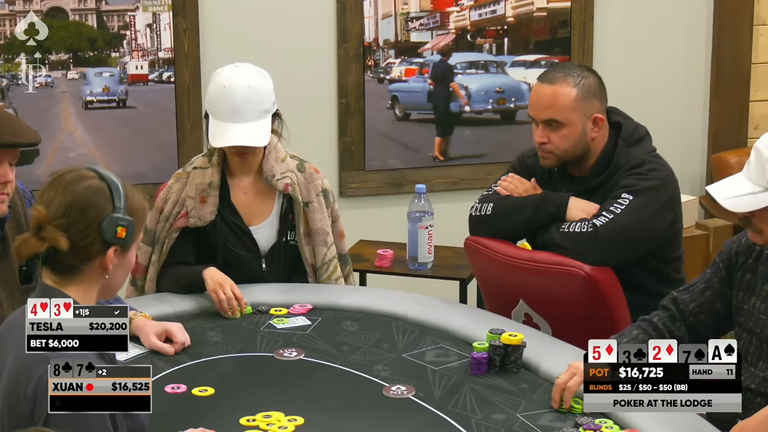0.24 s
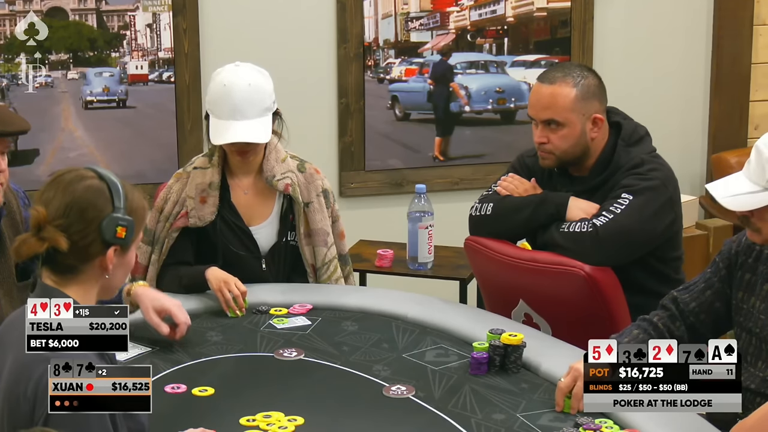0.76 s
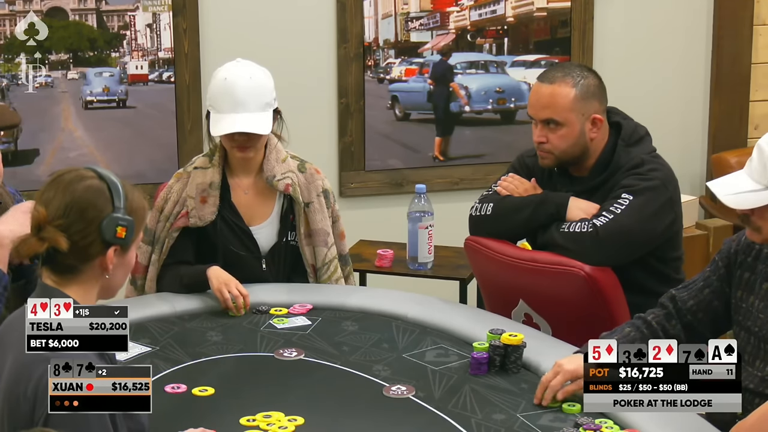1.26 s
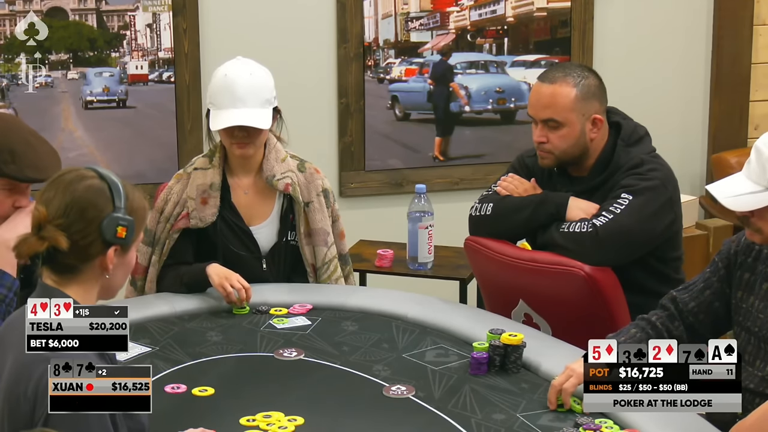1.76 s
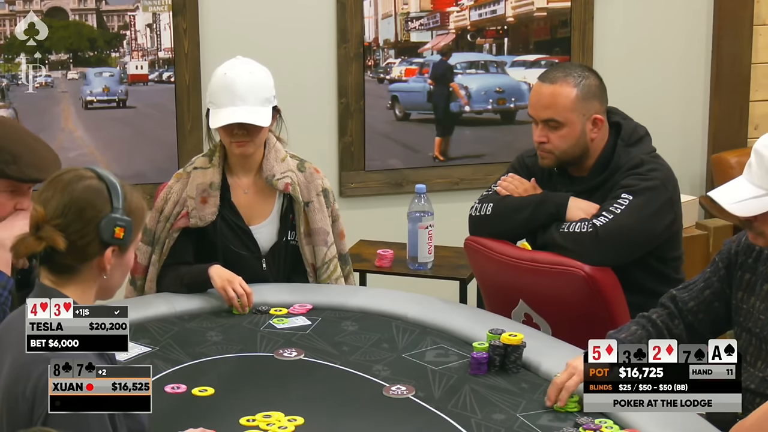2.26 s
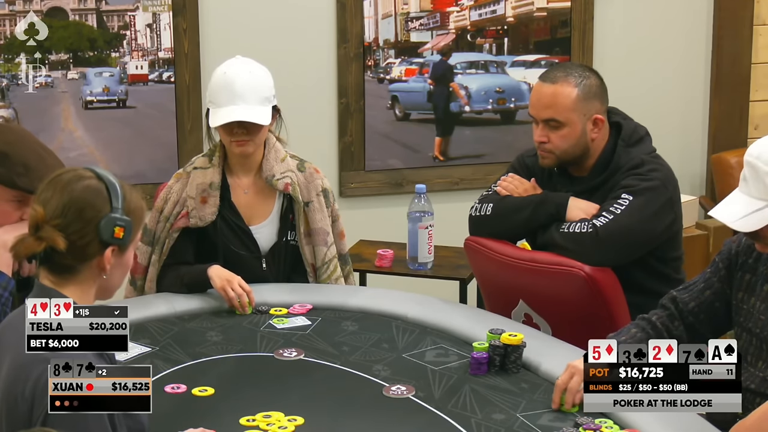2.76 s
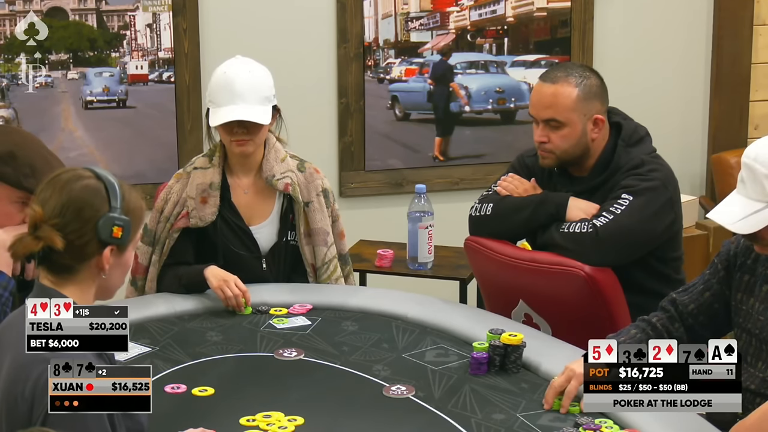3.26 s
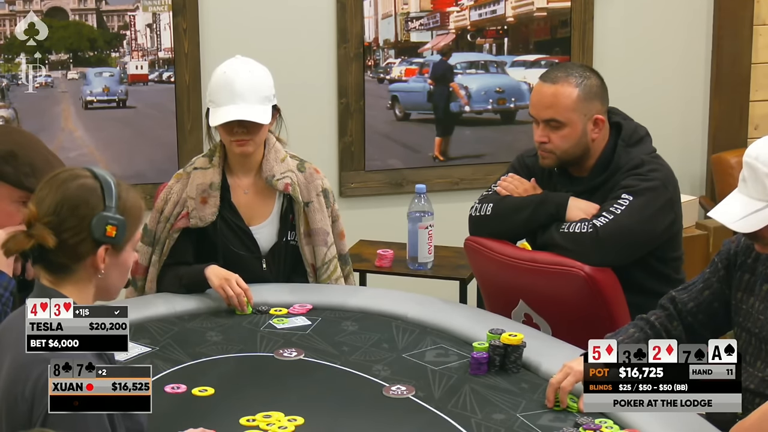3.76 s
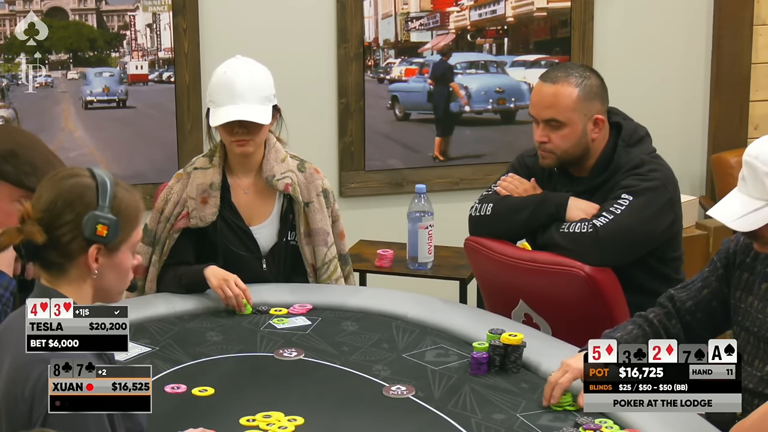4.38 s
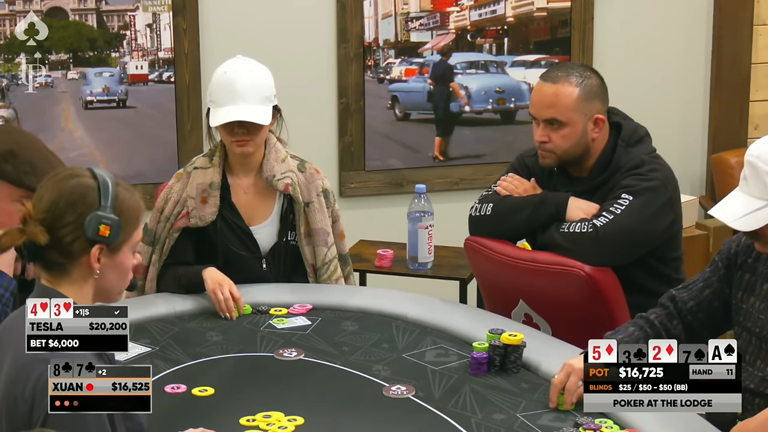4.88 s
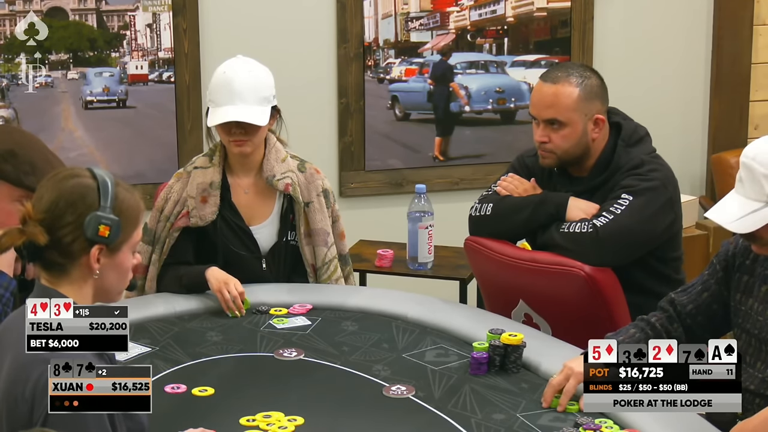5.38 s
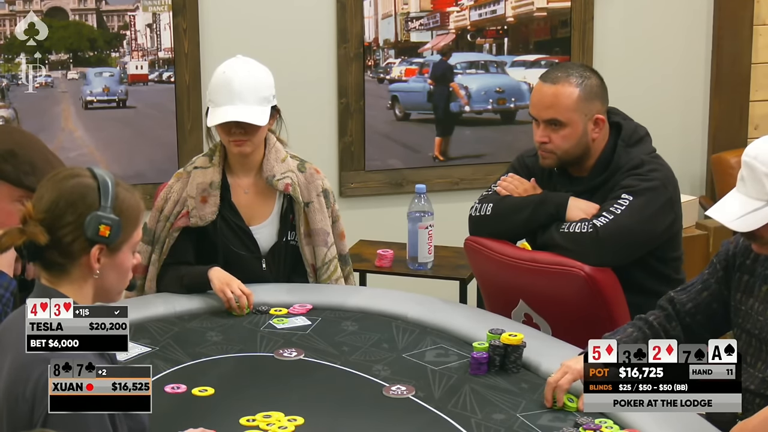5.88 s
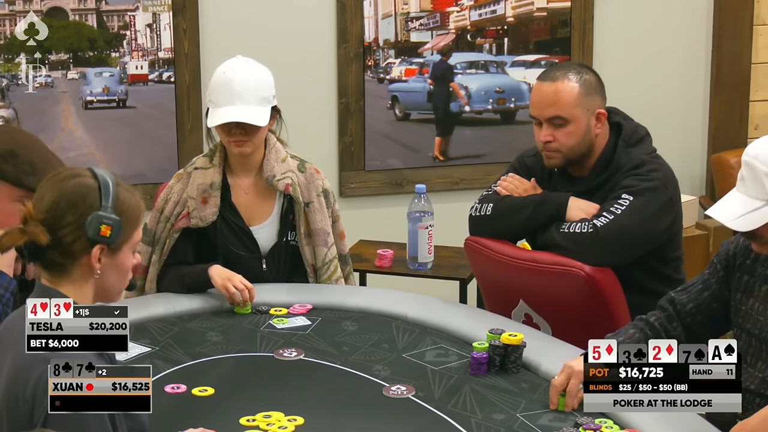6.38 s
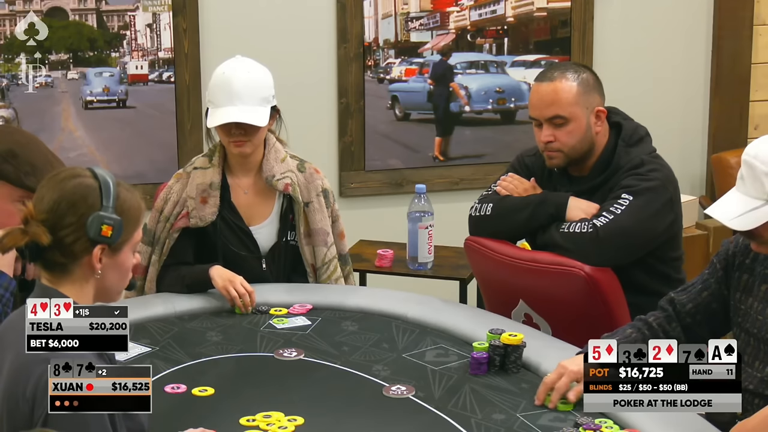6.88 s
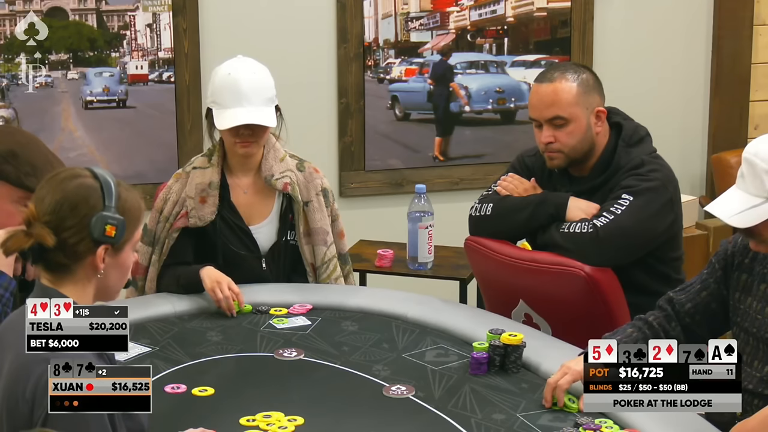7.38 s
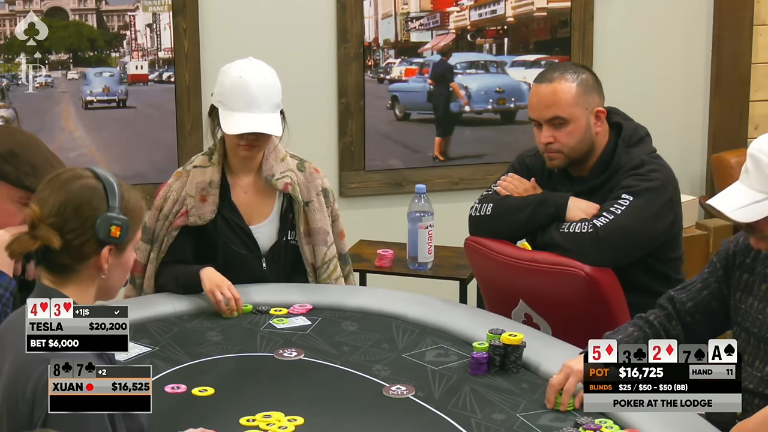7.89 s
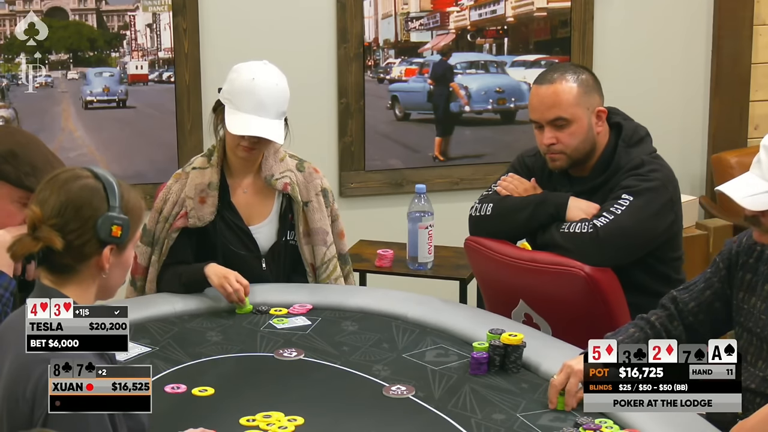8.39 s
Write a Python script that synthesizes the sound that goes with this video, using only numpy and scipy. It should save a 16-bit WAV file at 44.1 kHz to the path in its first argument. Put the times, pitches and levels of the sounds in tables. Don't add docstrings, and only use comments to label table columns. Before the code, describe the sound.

Close, dry chip clatter: bright ticks, hard stack clacks and dull felt thuds, uneven pauses between, over quiet ventilation hum in a small room.

```python
import sys
import numpy as np
from scipy import signal
from scipy.fft import rfft, irfft
from scipy.io import wavfile
from scipy.ndimage import uniform_filter1d

SR = 44100
rng = np.random.default_rng(int(sys.argv[2]) if len(sys.argv) > 2 else 0)


def waveform_to_disk(signal):
    frames = np.transpose(np.atleast_2d(signal))
    scaled = np.clip(frames, -1, 1) * 32767
    samples = np.round(scaled).astype(np.int16)
    wavfile.write(sys.argv[1], SR, samples)


def to_linear_factor(level_db):
    exponent = np.asarray(level_db, float) / 20
    return 10 ** exponent


N = 381024
BLOW_SAMPLES = 2048
HUM_HZ, HUM_DB = 120, -6.5


def chip_contacts():
    # start_s, clack_peak_db, clack_hz, tick_peak_db
    clacks = [(.1631, -25, 1895, -34), (.1821, -24, 4360, -30), (.2077, -27, 2770, -37),
              (.9732, -19.5, 3800, -26), (.9773, -20.5, 2660, -23.5), (1.0422, -19, 4630, -24.5),
              (1.0579, -25.5, 2670, -32), (1.3679, -23, 2150, -43.5), (2.019, -28, 1970, -33),
              (2.039, -20, 1490, -29), (2.0445, -22.5, 1980, -20), (2.0493, -11.5, 2238, -19.5),
              (3.8525, -25, 2290, -32), (3.896, -22.5, 1570, -30.5), (4.2695, -26.5, 1985, -29.5),
              (4.303, -13.5, 2590, -26.5), (4.503, -33, 4430, -30), (5.4028, -12, 3540, -23),
              (5.414, -20.5, 3210, -34), (5.4212, -21, 2500, -53), (5.6704, -21, 2180, -33),
              (5.8678, -23.5, 1550, -20), (5.8844, -38, 1630, -24), (5.8943, -35, 2190, -44.5),
              (6.4318, -41.5, 1400, -37), (6.8213, -29, 1600, -22.5), (7.522, -24, 1700, -22.5),
              (7.5456, -23.5, 1630, -23.5), (7.5713, -29, 1980, -49), (7.6152, -18, 2443, -16.5),
              (7.6185, -15.5, 2200, -33), (.7425, -21.5, 2470, -43), (.7495, -30.5, 2070, -50),
              (5.1902, -34, 2280, -20.5), (5.194, -42, 3020, -21), (5.2025, -25.5, 2400, -23),
              (5.2125, -39, 2420, -29), (4.9965, -26.5, 1810, -49), (8.5232, -14, 2893, -20),
              (8.5246, -14.5, 2220, -30)]
    # start_s, clack_peak_db, clack_hz, tick_re_clack_db
    touches = [(0.4236, -46, 2150, -6), (0.758, -32, 1830, -19), (0.7764, -44, 2320, -12),
               (0.804, -41, 2300, -5), (1.2426, -48.5, 2690, -7), (1.329, -31, 2250, -14.5),
               (1.387, -28, 2200, -9), (1.3804, -23, 2150, -22), (1.412, -37, 2030, -12),
               (1.643, -44.5, 2080, -18), (1.682, -43, 2000, -8), (1.8144, -43, 2000, -15),
               (1.8502, -47, 2010, -15), (2.2007, -51, 2180, -13), (2.485, -50, 2590, -15),
               (3.2306, -31.5, 3620, -31), (3.717, -57, 2320, -12), (4.1989, -54, 1840, -18),
               (4.758, -51, 2180, -9), (4.857, -45.5, 2620, -28), (4.9282, -47, 2420, -14),
               (5.045, -39, 2590, -24), (5.0998, -51, 2430, -17), (5.376, -43, 1960, -19),
               (5.391, -29.5, 3660, -14), (5.426, -39, 2890, -15), (5.443, -35, 2380, -15),
               (5.463, -28, 2140, -23), (5.4834, -35, 1850, -25), (5.5494, -46, 2000, -2),
               (5.6247, -44, 3600, -14), (5.8157, -49, 2120, -12), (6.0727, -37.5, 2420, -9),
               (6.1188, -40.5, 3100, -1), (6.3285, -55, 3900, -10), (6.5075, -50, 3870, -15),
               (7.264, -48, 1900, -16), (7.9124, -55, 2440, -13), (7.9315, -44, 3570, -29),
               (7.9526, -35.5, 2740, -24)]
    # start_s, clack_peak_db, tick_peak_db
    flicks = [(1.0871, -30, -32), (1.0916, -29, -36.5), (1.3228, -28.5, -35), (1.3575, -25.5, -29),
              (1.711, -29, -36.5), (1.7432, -39.5, -64), (1.831, -36.5, -44), (1.8799, -34.5, -36),
              (1.9596, -37.5, -63), (1.9814, -33, -50), (2.46, -46, -53), (2.55, -41.5, -44),
              (2.5917, -46, -55), (2.703, -34, -38.5), (2.7755, -34.5, -34), (3.3943, -40, -30.5),
              (4.3787, -29.5, -38), (4.396, -35, -33), (4.473, -31, -36), (4.4818, -39, -43),
              (4.5199, -32, -22), (6.168, -39, -55), (6.2744, -29, -49), (6.4233, -37, -30.5),
              (6.4457, -35, -34), (6.5682, -41.5, -66), (6.795, -26, -35), (7.9582, -28.5, -39),
              (8.3453, -33, -43)]
    # start_s, clack_peak_db, tick_peak_db
    taps = [(.3804, -34.5, -45.5), (.4419, -34, -46.5), (.451, -43, -56), (.9957, -39, -47),
            (1.4604, -33.5, -33), (1.7743, -36.5, -49), (1.8917, -39, -48), (2.2143, -39, -47),
            (2.239, -29.5, -33), (2.2772, -31.5, -44), (2.5226, -46.5, -40), (2.6271, -37.5, -35.5),
            (3.411, -32, -40), (4.3627, -31, -46), (4.4457, -34, -37), (5.5247, -38, -41),
            (5.533, -34.5, -43), (6.0066, -36, -44), (6.128, -48, -43), (6.265, -35.5, -46),
            (6.2872, -29.5, -39), (6.3549, -39, -41), (6.5506, -41.5, -53), (6.7625, -33.5, -31.5),
            (6.8115, -28, -29), (6.869, -30, -31.5), (7.4728, -28.5, -32.5), (7.4789, -34, -52.5),
            (7.9481, -37, -39), (8.3912, -41, -45)]
    # start_s, peak_db
    far_clacks = [(0.192, -26), (0.6927, -41), (0.773, -31.5), (1.38, -31), (1.5796, -28.5), (1.598, -36),
                  (1.705, -45), (2.161, -39), (2.6484, -34), (3.052, -36.5), (3.2195, -44), (3.237, -37.5),
                  (3.2468, -39), (3.303, -42.5), (3.5365, -33), (3.866, -41), (4.9026, -47.5), (5.024, -45),
                  (5.177, -38), (5.363, -32.5), (5.373, -27.5), (4.322, -45), (4.335, -40), (4.347, -41),
                  (6.982, -28.5), (6.999, -36), (7.671, -31.5), (7.6816, -41), (7.706, -40), (7.817, -46),
                  (8.404, -42)]
    # start_s, peak_db
    rim_grazes = [(2.8007, -43.5), (5.2, -32.5), (1.272, -56), (1.952, -45), (7.596, -41), (2.5295, -48),
                  (2.59, -46), (1.441, -41), (2.742, -49), (5.833, -50), (7.655, -54), (7.681, -46),
                  (7.55, -32.5), (7.495, -44), (6.044, -54), (6.36, -46), (8.1961, -37), (8.2408, -41),
                  (0.188, -35), (1.4971, -51), (1.7526, -47), (1.9607, -59), (1.9791, -51), (1.995, -39.5),
                 (2.0335, -29), (2.2007, -50), (2.2352, -35), (2.2622, -48), (2.287, -53), (2.2998, -47),
                 (2.3174, -57), (2.7156, -48), (2.7936, -38), (2.8162, -51), (4.318, -36), (4.477, -34.5),
                 (5.176, -46), (5.5636, -49), (5.629, -52), (5.692, -40), (5.7096, -41), (5.8463, -41),
                 (5.895, -54), (6.092, -52), (6.1726, -35.5), (6.1973, -43), (6.3773, -42), (6.7866, -36),
                 (6.8546, -38), (6.9501, -51), (8.3561, -51)]
    # start_s, first_peak_db, gap_s, change_db (per chip), tick_re_clack_db
    runs = [
        (4.9806, -40, 0.004, -0.5, -16),
        (5.041, -44.5, 0.0089, 0.5, -27),
        (5.467, -23, 0.0066, -2.5, -36),
        (7.0806, -27.5, 0.0049, -2, -30),
        (7.754, -41.5, 0.017, -1.5, -10),
        (8.4959, -20.5, 0.0044, 2, 0.5),
    ]
    far_tick_db, graze_clack_db = -31, -8.5
    held = taps + [(s, db, db + far_tick_db) for s, db in far_clacks]
    held += [(s, db + graze_clack_db, db) for s, db in rim_grazes]
    for s, db, gap_s, change_db, tick_db in runs:
        for k in range(3):
            chip_db = db + k * change_db
            held.append((s + k * gap_s, chip_db, chip_db + tick_db))
    contacts = clacks + [(s, db, hz, db + tick_db) for s, db, hz, tick_db in touches]
    for rows, usual_hz, spread in [(held, 2238, .25), (flicks, 3723, .06)]:
        for s, db, tick_db in rows:
            contacts.append((s, db, usual_hz * (1 + spread * (rng.random() - .5)), tick_db))
    return contacts


def clicks():
    # hz, level_db, t60_s
    clack_modes = [(2150, -11.5, 0.024), (2473, -15.5, 0.011), (3604, -20, 0.048)]
    # hz, level_db, t60_s
    tick_modes = [(6150, -2, 0.0015), (9685, 10.5, 0.0086), (10780, 10, 0.0017)]
    clack_top_hz, tick_foot_hz = 4385, 5300
    crack_share = .9
    rows = chip_contacts()
    out, draws = np.zeros(N), rng.random((len(rows), 64))
    for (s, clack_db, clack_hz, tick_db), draw in zip(rows, draws):
        clack = np.array([(clack_hz, 0, .011)] + clack_modes)
        clack[1:, 0] *= 1 + .2 * (draw[16:19] - .5)
        clack[1:, 1] += 12 * (draw[20:23] - .5)
        tick = np.array(tick_modes)
        tick[:, 0] *= 1 + .1 * (draw[24:27] - .5)
        tick[:, 1] += 14 * (draw[32:35] - .5)
        contacts = chatter(draw, spread_s=.0014, fall_db=7.5)
        body = peak_one(ringing(clack)) + crack_share * crack(1300, 4250, t60_s=.012)
        edge = peak_one(ringing(tick)) + .3 * crack(5000, 7000, t60_s=.019)
        edge += .73 * crack(8400, 12180, t60_s=.011)
        body = peak_one(steep(np.convolve(contacts, body), clack_top_hz, "low"))
        edge = peak_one(steep(np.convolve(contacts, edge), tick_foot_hz, "high"))
        add(out, s, to_linear_factor(clack_db - 4.0) * body)
        add(out, s, to_linear_factor(tick_db - 5.5) * edge)
    return out


def chatter(draw, spread_s, fall_db):
    contacts = np.zeros(512)
    at = np.cumsum(np.r_[0, .3 + draw[1:5]]) * spread_s * SR
    level_db = -fall_db * (np.array([1.5, 0, 1, 2, 3]) + draw[5:10] * [1, 0, 1, 1, 1])
    contacts[np.clip(at, 0, 511).astype(int)] = to_linear_factor(level_db) * np.sign(draw[10:15] - .5)
    return contacts


def ringing(modes):
    t = np.arange(BLOW_SAMPLES) / SR
    hz, level_db, t60_s = np.transpose(modes)[:, :, None]
    return np.sum(to_linear_factor(level_db - 60 * t / t60_s) * np.sin(2 * np.pi * hz * t), axis=0)


def crack(low_hz, high_hz, t60_s):
    rise_s = .00033
    band = signal.butter(2, [low_hz, min(high_hz, .45 * SR)], "band", fs=SR, output="sos")
    t = np.arange(BLOW_SAMPLES) / SR
    noise = signal.sosfilt(band, rng.standard_normal(BLOW_SAMPLES))
    return peak_one(noise * to_linear_factor(-60 * t / t60_s) * np.minimum(t / rise_s, 1))


def add(out, s, sound):
    start = max(round(s * SR) - np.argmax(np.abs(sound)), 0)
    out[start:start + len(sound)] += sound[:N - start]


def peak_one(x):
    return x / (np.max(np.abs(x)) + 1e-12)


def rms_one(x):
    return x / np.sqrt(np.mean(x ** 2) + 1e-20)


def steep(x, hz, side):
    return signal.sosfilt(signal.butter(4, hz, side, fs=SR, output="sos"), x)


def singing():
    # start_s, level_db, upper_mode_change_db
    sings = [(1.0871, -35, -9), (1.7432, -37.5, -8), (1.831, -47, -2.5), (4.3787, -30, -14),
             (4.396, -27.5, -15), (4.4818, -35.5, 1), (6.168, -47, 2), (6.2744, -28, -10), (6.4233, -53, 1),
             (8.3453, -33, 0.5), (1.9596, -31, -15), (8.3567, -46, 0), (4.503, -38, 5), (2.261, -50, 10),
             (7.6, -46, 4)]
    # hz, level_db, t60_s
    free_chip = [(3680, -8, .028), (3800, -13, .02), (6440, -8, .035)]
    out = np.zeros(N)
    for (s, level_db, upper_db), draw in zip(sings, rng.random((len(sings), 2))):
        modes = np.array(free_chip) * [1 + .019 * (draw[0] - .5), 1, .85 + .5 * draw[1]]
        modes[-1, 1] += upper_db
        add(out, s, to_linear_factor(level_db) * ringing(modes))
    return out


def chip_rattle(per_s):
    # hz, level_db (per Hz)
    rustle = [(710, -30), (1200, -4), (2390, 4.5), (4500, -2), (6390, 1.5), (7530, -17.5), (8580, -1.5),
              (10500, -7), (14500, -16), (15700, -18), (16400, -70)]
    hits = rng.random(N) < per_s * to_linear_factor(3 * drift(40)) / SR
    sizes = to_linear_factor(3.0 * np.minimum(rng.exponential(1, N), 4)) * hits
    grains = signal.lfilter([1], [1, -.975], sizes) + .75
    return colour(grains * rng.standard_normal(N), rustle)


def drift(rate_hz):
    knots = rng.standard_normal(1200)
    return np.interp(np.arange(N) / SR * rate_hz, np.arange(1200), knots)


def colour(x, spectrum):
    hz, level_db = np.transpose(spectrum)
    bins_hz = np.maximum(np.arange(len(x) // 2 + 1) * SR / len(x), 1)
    gain_db = np.interp(np.log(bins_hz), np.log(hz), level_db)
    return rms_one(irfft(rfft(x) * to_linear_factor(gain_db), len(x)))


def thuds():
    # start_s, peak_db, pitch_hz
    felt_thuds = [(0.1606, -30, 538), (.195, -31.5, 290), (0.5862, -48, 545), (0.778, -37.5, 553),
                  (1.354, -29.5, 403), (1.3799, -31, 520), (1.3878, -14, 556), (1.4173, -40, 590),
                  (1.8593, -43, 516), (2.2152, -31, 540), (2.65, -41, 430), (3.0484, -27, 277),
                  (3.066, -47, 304), (3.461, -42, 554), (4.2728, -33.5, 577), (4.9819, -40.5, 376),
                  (5.015, -41, 282), (5.189, -24.5, 530), (5.2291, -29.5, 516), (5.6748, -20.5, 401),
                  (6.821, -24.5, 625), (7.0244, -28.5, 490), (7.0316, -33, 565), (7.0352, -34, 260),
                  (7.04, -32, 250), (7.0665, -36.5, 485), (3.0423, -29.5, 295), (7.081, -37, 365),
                  (7.137, -42, 298), (7.4725, -29, 629), (7.5711, -21.5, 520), (7.607, -27.5, 330),
                  (7.6182, -21, 602), (8.5589, -32.5, 557), (8.6072, -34, 520)]
    # start_s, peak_db, pitch_hz
    knocks = [(0.185, -25, 1050), (0.692, -43, 800), (0.75, -32.5, 1060), (0.9772, -20, 980),
              (1.0435, -28.5, 790), (1.0922, -35, 910), (1.3196, -38.5, 735), (1.5813, -43, 825),
              (2.0186, -31, 1040), (2.039, -22, 990), (2.0522, -32, 950), (3.238, -43, 820),
              (3.537, -43.5, 1380), (3.854, -23.5, 890), (3.868, -30.5, 850), (3.8925, -25.5, 1170),
              (4.998, -43, 1250), (5.404, -32, 950), (5.416, -30, 1300), (5.524, -36.5, 1200),
              (5.868, -21, 984), (5.885, -24, 935), (6.1453, -42.5, 1030), (6.2861, -35, 1220),
              (7.4852, -35, 770), (7.5218, -21.5, 1030), (7.544, -26.5, 1100), (7.773, -39.5, 915),
              (7.9595, -36.5, 930), (8.5251, -16.5, 910), (5.6723, -24.5, 1000), (1.8251, -45.5, 763),
              (6.74, -47.5, 700), (1.704, -48, 1290)]
    cycles, top_hz = 7.0, 1700
    sag = .21
    rows = felt_thuds + knocks
    out, draws = np.zeros(N), rng.random((len(rows), 24))
    age = np.arange(BLOW_SAMPLES)
    for (s, peak_db, hz), draw in zip(rows, draws):
        t60_s = cycles / hz
        modes = [(hz, 0, t60_s),
                 (hz * (.6 + .95 * draw[16]), -13, t60_s),
                 (hz * (1.4 + .6 * draw[17]), -12, .51 * t60_s)]
        ahead = sag * 2 * SR / hz * (1 - np.exp(-age * hz / SR / 2))
        ring = np.interp(np.minimum(age + ahead, BLOW_SAMPLES - 1), age, ringing(modes))
        top = peak_one(ring) + .384 * crack(.5 * hz, 1.6 * hz, t60_s=.0227)
        swell = np.minimum(age / SR * hz / .77, 1)
        contacts = chatter(draw, spread_s=.0015, fall_db=12.0)
        thud = peak_one(steep(np.convolve(contacts, top * swell), top_hz, "low"))
        add(out, s, to_linear_factor(peak_db + .87) * thud)
    return out


def bumps():
    # start_s, peak_db, pitch_hz, t60_s
    hits = [
        (3.05, -32.5, 257, 0.3),
        (7.03, -33.5, 301, 0.26),
        (7.112, -37.5, 270, 0.34),
    ]
    out, t = np.zeros(N), np.arange(SR // 4) / SR
    for s, peak_db, hz, t60_s in hits:
        band = signal.butter(2, [hz / .96, hz * 1.72], "band", fs=SR, output="sos")
        roll = rms_one(signal.sosfilt(band, rng.standard_normal(len(t))))
        roll *= to_linear_factor(-60 * t / t60_s) * np.minimum(t * hz / 2, 1)
        start = round((s - 2 / hz) * SR)
        out[start:start + len(t)] += to_linear_factor(peak_db - 6.5) * roll
    return out


def room(x):
    t60_s, cut_hz, first_s = .22, 3500, .006
    t = np.arange(SR // 2) / SR
    tail = rng.standard_normal(len(t)) * to_linear_factor(-60 * t / t60_s) * (t > first_s)
    tail = signal.lfilter(*signal.butter(1, cut_hz, fs=SR), tail)
    return signal.fftconvolve(x, tail / np.sqrt(np.sum(tail ** 2)))[:N]


def near_gains():
    # start_s, room_db, closing_db_per_s, rattle_db
    openings = [(0.154, -43.5, 72, -45.5), (0.743, -45, 75, -55), (.975, -52.5, 23, -68),
                (1.35, -42.5, 55, -45), (1.954, -59.5, 14.5, -54), (2.034, -44, 53.5, -44.5),
                (2.196, -62, 40, -60), (2.253, -62, 36.5, -59.5), (2.515, -65.5, 16, -61.5),
                (3.043, -47.5, 44.5, -67.5), (3.851, -44, 71, -46), (4.267, -49.5, 81, -49),
                (4.312, -59.5, 48, -53.5), (4.38, -75.5, 59, -57), (4.98, -59, 70, -84),
                (5.185, -43, 76.5, -37.5), (5.4, -47, 43, -61), (5.466, -52, 58.5, -73.5),
                (5.619, -60, 115, -50.5), (5.667, -45, 74, -48), (5.815, -62, 55, -57),
                (5.869, -45.5, 55.5, -39.5), (6.119, -75, 43, -55), (6.422, -77, 52, -57),
                (6.813, -43, 66, -38.5), (7.029, -43.5, 87, -67), (7.466, -44.5, 50, -53),
                (7.519, -49.5, 56, -43.5), (7.95, -56, 80, -86), (8.498, -45.5, 51, -78)]
    t, air, rattle = np.arange(N) / SR, np.zeros(N), np.zeros(N)
    for s, room_db, closing_db, rattle_db in openings:
        age_s = np.clip(t - s, 0, 3)
        air_now = to_linear_factor(room_db - closing_db * age_s) * np.minimum(age_s / .031, 1)
        rattle_now = to_linear_factor(rattle_db - 2.71 * closing_db * age_s) * np.minimum(age_s / .0036, 1)
        air = np.maximum(air, air_now)
        rattle = np.maximum(rattle, rattle_now)
    return air, rattle


def near_room(buzz):
    # hz, level_db (per Hz)
    air_spectrum = [(15, -58), (25, -54), (59, -17.5), (123, -8.5), (217, -7.5), (887, -10.5), (1700, -24),
                    (2280, -15.5), (4610, -35.5), (6380, -57), (7710, -40.5), (9840, -44), (14000, -49),
                    (16000, -71.5)]
    return coloured_noise(air_spectrum, flicker_db=2.8) + to_linear_factor(HUM_DB) * buzz


def resting_room(buzz):
    # time_s, level_db
    mixer_level = [(0, -62.5), (1.65, -64.5), (1.92, -66.5), (2.4, -66), (2.7, -66.5), (4.3, -62.5),
                   (4.45, -83), (4.6, -64.5), (4.7, -64.5), (5.6, -59.5), (6.2, -65), (6.45, -67),
                   (6.6, -70.5), (6.7, -64), (7.4, -61.5), (8.2, -65.5), (8.4, -62), (8.64, -79)]
    # hz, level_db (per Hz)
    rumble = [(15, -43), (25, -36), (49, -22), (120, 8.5), (180, -2.5), (503, -2), (863, -7.5),
              (1650, -19.5), (1940, -14), (2350, -15), (4740, -27.5), (11300, -30), (14800, -37),
              (16000, -53)]
    level_db = np.interp(np.arange(N) / SR, *np.transpose(mixer_level))
    return to_linear_factor(level_db) * (coloured_noise(rumble, flicker_db=1.5) + to_linear_factor(HUM_DB - 9.0) * buzz)


def coloured_noise(spectrum, flicker_db):
    return colour(rng.standard_normal(N) * to_linear_factor(flicker_db * drift(25)), spectrum)


def hum():
    width_hz = 5.5
    r, w = np.exp(-np.pi * width_hz / SR), 2 * np.pi * HUM_HZ / SR
    waver = signal.lfilter([1], [1, -2 * r * np.cos(w), r * r], rng.standard_normal(N))
    return rms_one(np.sin(w * np.arange(N)) + 1.3 * rms_one(waver))


def patchy(x):
    edges_hz = [4200, 5500, 7000, 8800, 11000, 13500, 17000]
    block_s, sunk_share, depth_db = .012, .2, -9
    out, block = x.copy(), (np.arange(N) / SR / block_s).astype(int)
    for low_hz, high_hz in zip(edges_hz, edges_hz[1:]):
        sos = signal.butter(2, [low_hz, high_hz], "band", fs=SR, output="sos")
        band = signal.sosfiltfilt(sos, x)
        sunk = (rng.random(block[-1] + 1) < sunk_share)[block]
        out -= band * uniform_filter1d(sunk * (1 - to_linear_factor(depth_db)), size=80)
    return out


def scene():
    low_cut_hz, room_db = 170, -17
    air, rattle = near_gains()
    blows = steep(clicks() + thuds(), low_cut_hz, "high")
    loose = rattle * chip_rattle(per_s=550)
    buzz = hum()
    echo = to_linear_factor(room_db) * room(blows + loose)
    background = patchy(loose + echo + resting_room(buzz) + air * near_room(buzz))
    mono = blows + singing() + bumps() + background
    return np.array([mono, mono])


def dip_gain(rows):
    gain_db = np.zeros(N)
    for from_s, to_s, depth_db in rows:
        gain_db[round(from_s * SR):round(to_s * SR)] = depth_db
    return to_linear_factor(uniform_filter1d(gain_db, size=60))


def level_dips(dry):
    returns_s = [0.153, 0.734, 0.97, 3.848, 4.264, 5.173, 5.663, 5.812, 6.258, 7.465, 8.493]
    # from_s, to_s, depth_db
    holes = [(.722, .736, -7), (.982, .997, -25), (1.334, 1.349, -9), (1.699, 1.708, -8),
             (1.72, 1.726, -16), (4.968, 4.978, -15), (5.002, 5.01, -10), (5.16, 5.173, -14),
             (5.38, 5.399, -6), (5.424, 5.431, -35), (6.105, 6.117, 5), (6.3, 6.31, -15),
             (6.414, 6.421, -4), (7.504, 7.517, -22), (7.53, 7.541, -9), (7.624, 7.632, -36),
             (1.966, 1.972, -17), (1.989, 1.995, -15), (2.008, 2.014, -14), (2.057, 2.064, -34),
             (4.28, 4.298, -3), (4.452, 4.468, -7), (4.492, 4.499, -14), (2.225, 2.233, -3),
             (2.58, 2.587, -10), (2.636, 2.644, -9), (2.692, 2.7, -17), (2.245, 2.251, -7)]
    # from_s, to_s, depth_db
    full_mutes = [
        (1.402, 1.413, -73),
        (7.625, 7.634, -55),
    ]
    dropout_s, dropout_db, dropout_hz, hole_hz = .012, -13, 1700, 5000
    bass = signal.sosfiltfilt(signal.butter(2, dropout_hz, fs=SR, output="sos"), dry)
    treble = (dry - bass) * dip_gain([(s - dropout_s, s, dropout_db) for s in returns_s])
    top = signal.sosfiltfilt(signal.butter(4, hole_hz, "high", fs=SR, output="sos"), treble)
    return (bass + treble - top * (1 - dip_gain(holes))) * dip_gain(full_mutes)


def channel_difference(x):
    side_db, treble_db, knee_db = -35, -12, -64
    high = np.diff(steep(x, 3500, "high"), prepend=0)
    level = np.sqrt(np.abs(uniform_filter1d(high ** 2, size=400)))
    held = high / (1 + level / to_linear_factor(knee_db))
    return to_linear_factor(side_db) * x * drift(100) + to_linear_factor(treble_db) * np.roll(held, 700)


def roll_off(x):
    return signal.sosfilt(signal.butter(12, 15400, fs=SR, output="sos"), x)


def record(dry):
    mixed = level_dips(dry)
    side = channel_difference(mixed[0])
    return roll_off(mixed + side * [[1], [-1]])


dry = scene()
out = record(dry)
waveform_to_disk(out)
```